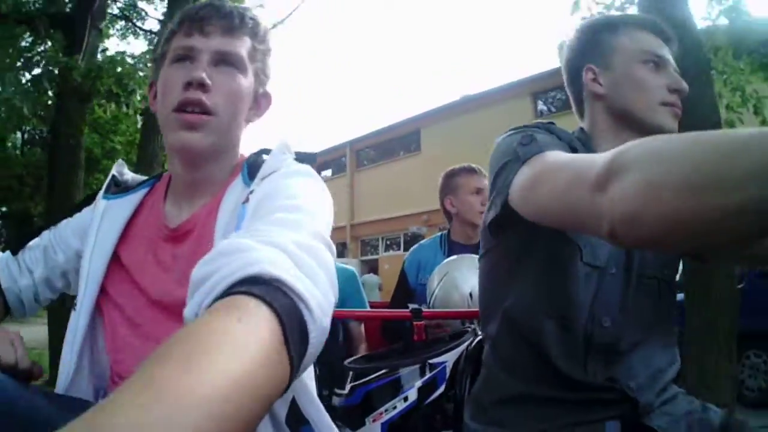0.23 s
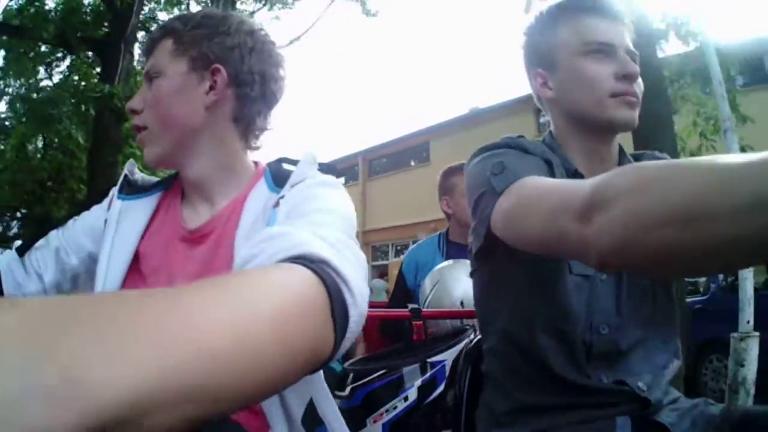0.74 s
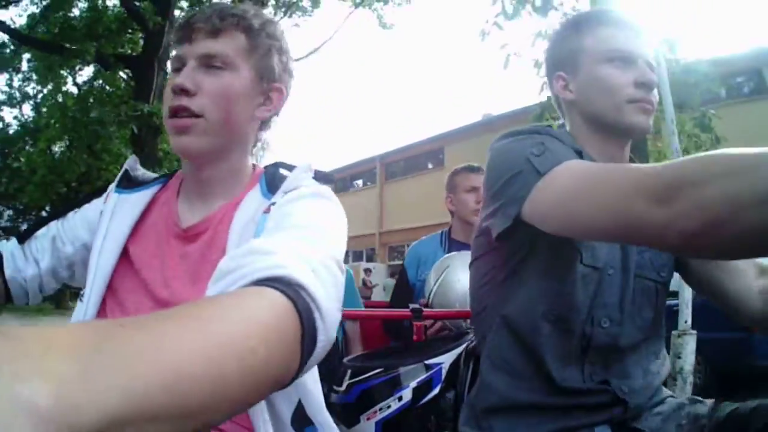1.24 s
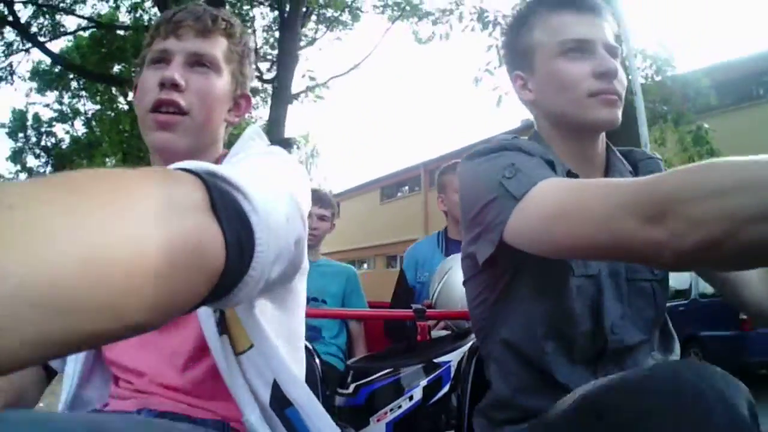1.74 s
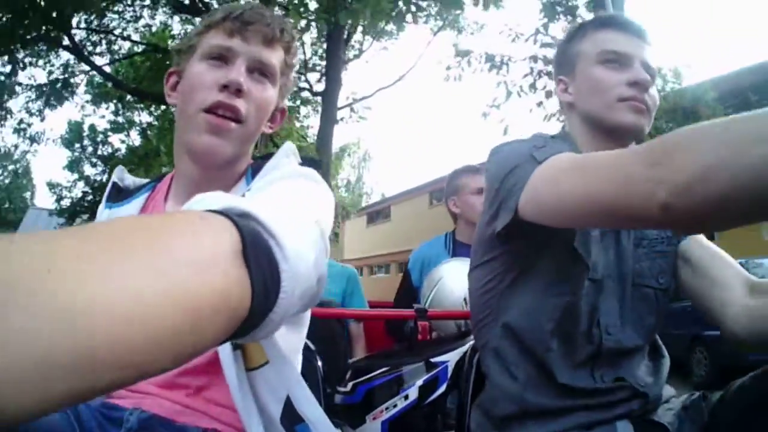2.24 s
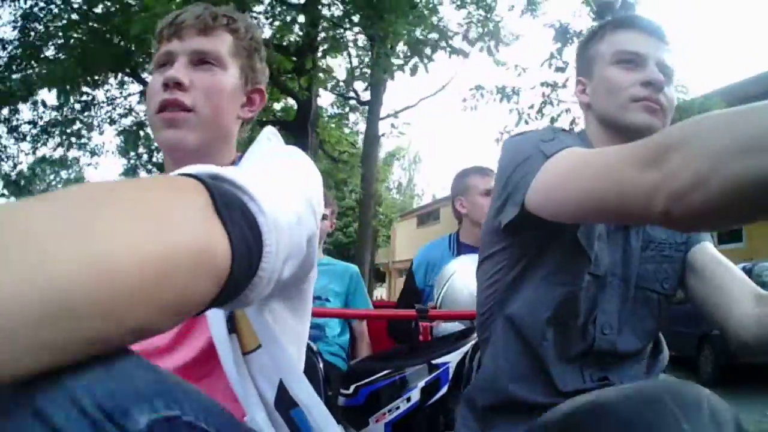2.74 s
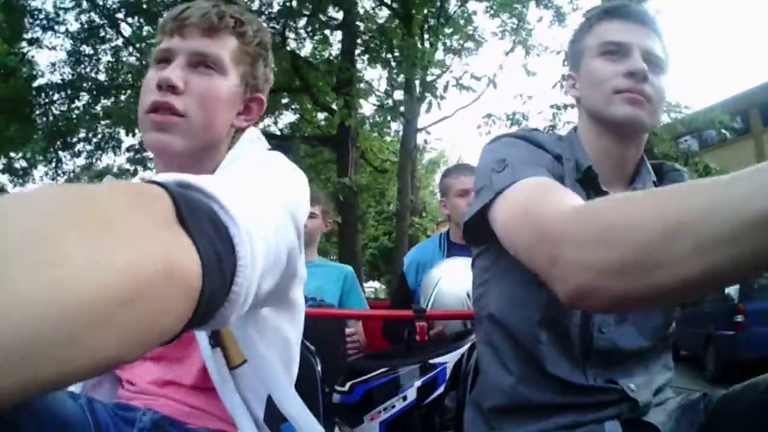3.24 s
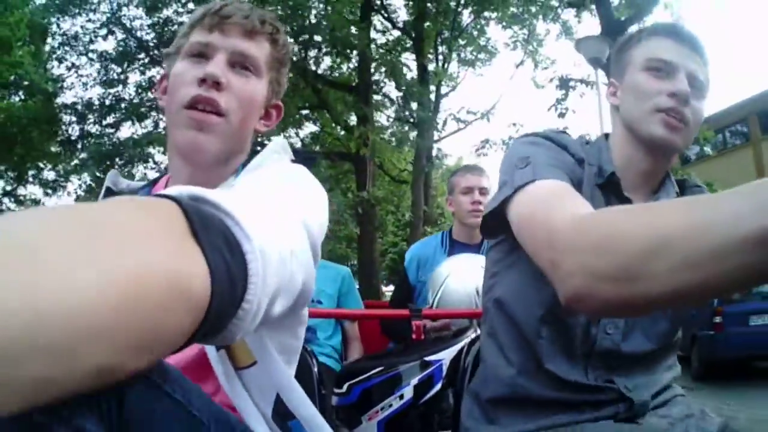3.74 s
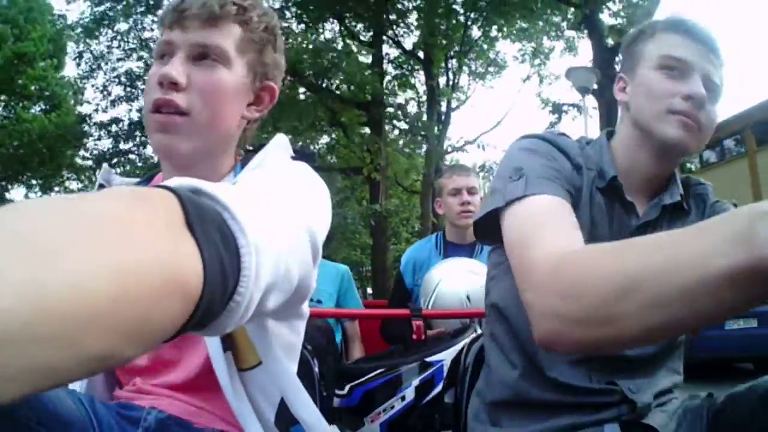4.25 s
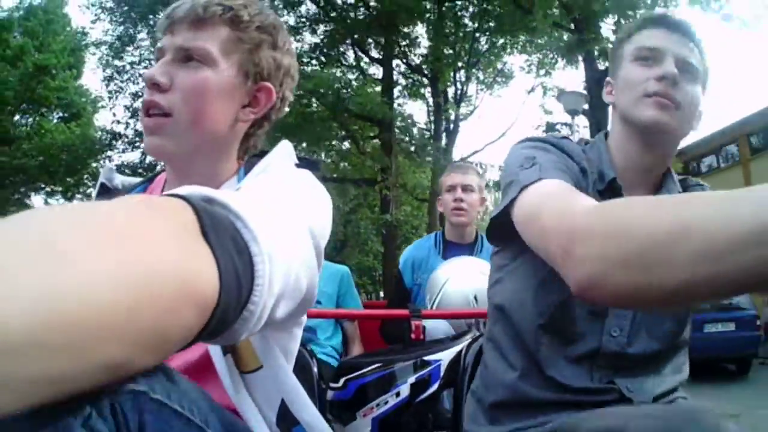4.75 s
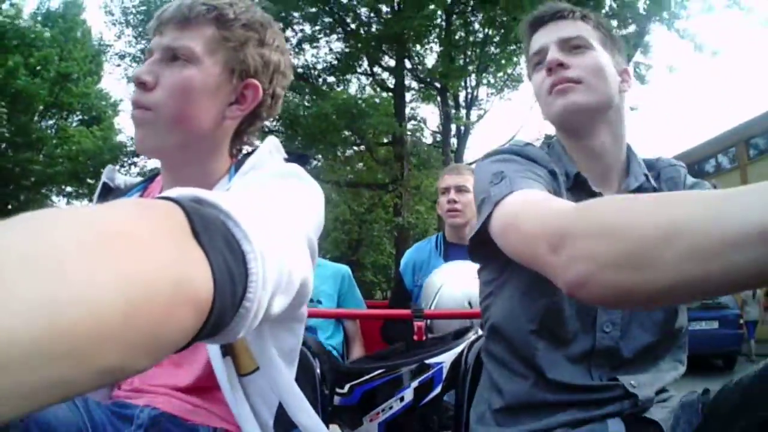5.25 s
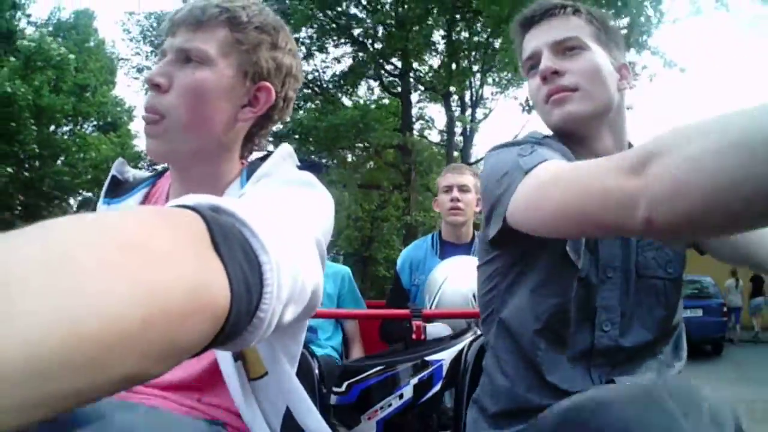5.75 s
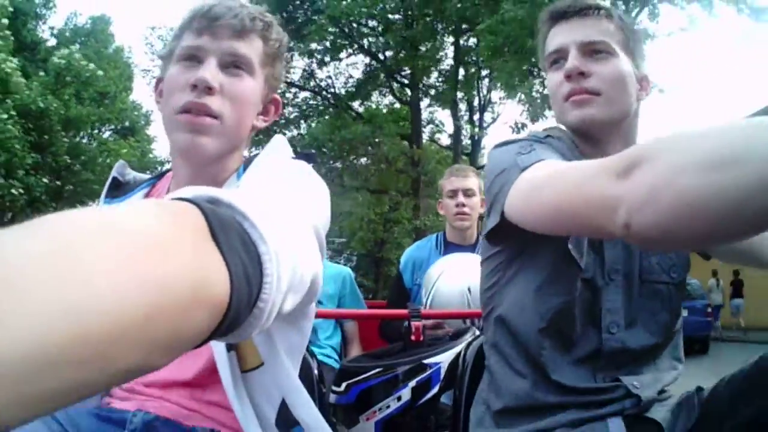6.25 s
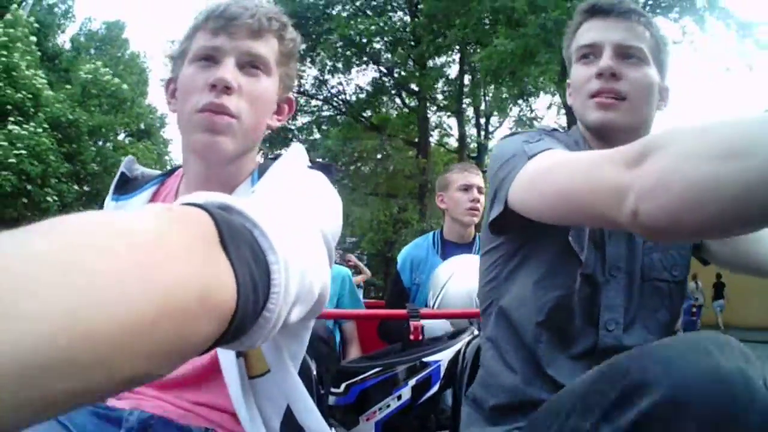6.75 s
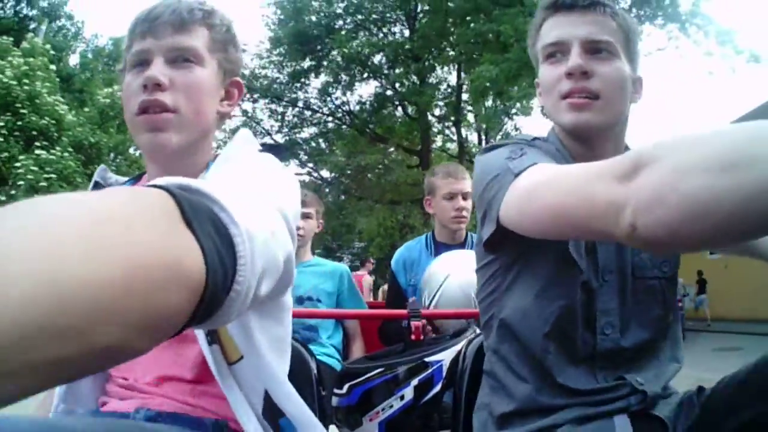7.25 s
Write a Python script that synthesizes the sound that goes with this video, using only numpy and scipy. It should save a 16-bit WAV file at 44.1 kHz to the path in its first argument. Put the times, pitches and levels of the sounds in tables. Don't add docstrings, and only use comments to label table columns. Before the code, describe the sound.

A small microphone clamped to a rolling cart picks up vibration through its case: a wavering deep hum, floor rumble, hollow panel knocks and chain rattle. A violent early blow distorts. Scattered metal clanks continue, with a quieter stretch around two to three seconds, then busier strikes and short bearing squeaks after five. Faint low wind, thin hiss and tiny rapid recorder ticks lie behind, outdoors and without noticeable echo.

```python
import sys
import numpy as np
from scipy import signal
from scipy.fft import rfft, irfft, next_fast_len
from scipy.io import wavfile
from scipy.ndimage import map_coordinates

SR = 44100
rng = np.random.default_rng(int(sys.argv[2]) if len(sys.argv) > 2 else 0)


def invert_db(level):
    return 10 ** (np.asarray(level, dtype=float) / 20)


def wav_record(signal):
    frames = np.transpose(np.atleast_2d(signal))
    bounded = np.clip(frames, -1, 1)
    quanta = np.round(bounded * 32767).astype(np.int16)
    wavfile.write(sys.argv[1], SR, quanta)


N = 330309

# t/s, load on the tyres level/dB, roughness level/dB
ROAD = [(0.0, -24.5, -32), (0.27, -35.5, -35), (0.6, -38, -36), (0.73, -35.5, -36.5), (2.19, -35.5, -35.5),
        (2.4, -35, -35.5), (2.8, -36.5, -37.5), (3.4, -38, -36.5), (3.59, -33, -36.5), (3.92, -37, -37),
        (4.69, -34, -37.5), (4.84, -34.5, -36), (5.23, -32.5, -34.5), (5.42, -32.5, -34.5),
        (5.61, -33, -34.5), (6.07, -32, -36.5), (6.26, -34, -35.5), (7.49, -36.5, -36)]
# t/s, peak level/dB, low bar above it level/dB, decay t60/s
CLINKS = [(0.0, -23.5, 3, 0.12), (0.044, -18.5, -1, 0.19), (0.1336, -18, 3.5, 0.065),
          (0.5195, -19, -11, 0.13), (0.5473, -23, -13, 0.087), (0.8934, -22.5, 6.5, 0.092),
          (1.2446, -22, -1.5, 0.17), (1.2905, -18.5, 7, 0.082), (1.7425, -21, -3.5, 0.15),
          (3.493, -29, 5, 0.077), (3.5137, -23.5, 0, 0.1), (3.5642, -18, -2.5, 0.11),
          (3.85, -15.5, -6.5, 0.09), (3.922, -17, -3.5, 0.064), (4.72, -25.5, -16, 0.075),
          (4.8453, -16, -1, 0.18), (5.352, -23.5, 2.5, 0.07), (5.4101, -13.5, -3, 0.091),
          (5.4953, -23.5, 4, 0.092), (5.7812, -11, -4, 0.091), (5.8293, -15.5, -8, 0.12),
          (5.9396, -16.5, -2, 0.12), (6.4293, -17, -3, 0.095), (6.592, -12.5, 1, 0.076),
          (6.751, -22, 1.5, 0.17), (6.9108, -19, 1, 0.11), (6.9338, -26, -7, 0.053),
          (7.2637, -18, -8, 0.082), (7.284, -22.5, -6, 0.13), (7.3397, -17.5, 2.5, 0.042)]
# f/Hz, width f/Hz, level/dB
DECK = [(113, 43, -17), (168.5, 39.2, -7.5), (208.5, 22.6, -6), (276.3, 17.1, 0.5), (310, 180, -29),
        (458, 75, -31)]
# f/Hz, width f/Hz, level/dB
PANEL = [(788, 46, -12.5), (898, 32, 2.5), (1055.4, 25.6, 2), (1159.7, 35, -1), (1284, 57, -3),
         (1397, 71, -8), (1667, 93, -10.5)]
# f/Hz, width f/Hz, level/dB
BAR = [(2089, 66.4, 3), (2326, 210, -8)]
# f/Hz, width f/Hz, level/dB
STEEL = [(2493, 88, -5.5), (2679, 67, 0.5), (2814, 86, 3), (2986, 80, 2), (3179, 130, -8.5),
         (3434, 60, -7.5), (3592, 38, -13.5), (3759, 47, -5.5), (5175, 200, -16)]


def unit(x):
    return x / np.sqrt(np.mean(x ** 2) + 1e-20)


def curves(rows):
    s, *cols = np.transpose(rows)
    return [np.interp(np.arange(N) / SR, s, c) for c in cols]


def filtered(x, response, keep=True):
    m = next_fast_len(N + SR // 2)
    gain = response(np.fft.rfftfreq(m, 1 / SR))
    scale = np.sqrt(np.mean(abs(gain) ** 2)) if keep else 1
    return irfft(rfft(x, m) * gain / scale, m)[:N]


def peak(f, hz, width):
    return 1j * f * width / (hz * hz - f * f + 1j * f * width)


def rung(force, modes, kick=14):
    chatter = force * rng.standard_normal(N)
    strike = kick * np.maximum(np.diff(force, prepend=force[0]), 0)

    def response(f):
        return sum((-1) ** k * invert_db(db) * peak(f, hz, width) for k, (hz, width, db) in enumerate(modes))

    return filtered(chatter + strike, response)


def coloured(points):
    hz, db = np.transpose(points)
    white = rng.standard_normal(N)
    return filtered(white, lambda f: invert_db(np.interp(np.log(f + 1), np.log(hz), db, -120, -120)))


def bursts(times, db, t60, hold=.012, rise=1e-5):
    force = np.zeros(N + SR)
    t = np.arange(SR // 2) / SR
    swell = np.minimum(1, .3 + t / rise)
    for s, level_db, fall in zip(times, db, t60):
        decay_db = 60 * np.maximum(t - hold, 0) / max(fall, .01)
        force[round(s * SR):][:len(t)] += invert_db(level_db - decay_db) * swell
    return force[:N]


def bumps(count, spread_db, t60):
    when, size = rng.random((count, 2)).T
    hits = np.bincount((when * N).astype(int), invert_db(-spread_db * np.log(size + .03)), N)
    return unit(signal.lfilter([1], [1, -invert_db(-60 / (t60 * SR))], hits))


def soft(x, top_hz):
    return filtered(x, lambda f: 1 / (1 - (f / top_hz) ** 2 + 1.2j * f / top_hz) ** 2, keep=False)


def rough(grows):
    db = curves(ROAD)[1]
    return db.mean() + grows * (db - db.mean())


def sway():
    # t/s, level/dB
    swing = [(0.0, -52), (0.25, -38), (0.5, -42.5), (1.35, -35), (2.67, -35), (2.9, -38.5), (3.25, -29),
             (3.42, -34.5), (3.52, -53), (3.59, -38), (5.01, -36.5), (5.09, -45), (5.34, -34.5),
             (6.22, -41), (6.8, -30), (6.97, -40.5), (7.45, -34), (7.49, -32)]
    # t/s, stall depth level/dB, pitch pull f/Hz
    stalls = [(0.0, 27, 1), (0.12, 31, 0), (0.42, 9, 0.5), (0.56, 14.5, 3.5), (1.02, 16, -3.5),
              (1.651, 6.5, -1.5), (2.73, 2.5, 0.5), (2.92, 5, -1.5), (3.521, 23, 0), (4.3, 7, 1),
              (4.63, 16, -1), (5.091, 15, 3), (5.28, 11.5, 0), (5.7, 12, -5.5), (5.941, 5.5, -2.5),
              (6.15, 14, 0.5), (6.339, 9.5, -0.5), (7.069, 11.5, 2), (7.22, -1, 0.5), (7.35, 2.5, -1.5)]
    centre_hz, drift_hz, flutter_db = 44, 1.1, 0.65
    stall_s, pull_s = 0.027, .07
    t = np.arange(0, N + 64, 64) / SR
    s, depth_db, pull_hz = np.transpose(stalls)[:, :, None]
    near = abs(t - s)
    knots, swell = rng.standard_normal((2, 120))
    drift = drift_hz * np.interp(t, np.arange(120) / 15, knots)
    pull = (pull_hz * np.exp(-(near / pull_s) ** 2)).sum(0)
    loss_db = (depth_db * np.exp(-near / stall_s)).sum(0)
    flutter = flutter_db * map_coordinates(swell, [t * 14])
    hz, stall_db = curves(np.transpose([t, centre_hz + drift + pull, loss_db + flutter]))
    return invert_db(curves(swing)[0] - stall_db + 5.5) * np.sin(2 * np.pi * np.cumsum(hz) / SR)


def deck():
    # t/s, peak level/dB, decay t60/s
    thumps = [(0.0, -20.5, 0.1), (0.054, -21, 0.05), (0.089, -40, 0.14), (0.141, -22.5, 0.57),
              (0.356, -22.5, 0.063), (0.433, -14.5, 0.31), (0.531, -17.5, 0.36), (0.599, -12.5, 0.1),
              (0.6209, -18.5, 0.086), (0.716, -23, 0.094), (1.199, -23, 0.14), (1.29, -19.5, 0.23),
              (1.872, -11.5, 0.11), (2.495, -19.5, 0.074), (3.38, -21, 0.14), (3.46, -13, 0.23),
              (4.881, -11, 0.25), (5.015, -16.5, 0.046), (5.216, -23, 0.19), (5.305, -18.5, 0.13),
              (5.4, -26.5, 0.2), (5.772, -18, 0.2), (6.047, -21.5, 0.05), (6.249, -20.5, 0.15),
              (6.294, -18.5, 0.06), (6.563, -28, 0.084)]
    s, db, t60 = np.transpose(thumps)
    shake = invert_db(curves(ROAD)[0] + 2) * unit(0.2 + bumps(count=200, spread_db=-2.5, t60=0.6))
    blows = bursts(s, db - 11.5, 1.2 * t60, hold=0.018)
    return rung(shake, DECK) + soft(rung(blows, DECK, kick=42), top_hz=800)


def panels(stones):
    # t/s, peak level/dB, box resonance above it level/dB
    knocks = [(0.0, -37, -12.5), (0.045, -23.5, -5), (0.133, -17, -11.5), (0.483, -16.5, -24.5),
              (0.897, -17.5, -30), (1.293, -10.5, -17), (7.284, -28, -11), (1.744, -24.5, -30),
              (1.869, -10.5, -32), (2.499, -31.5, 1), (3.212, -28, -16), (3.456, -17.5, -8),
              (3.852, -20.5, -9), (3.924, -23, -35), (4.8455, -16.5, -7), (5.016, -14, -48),
              (5.038, -35.5, -31), (5.351, -22.5, 0.5), (5.442, -23, -1), (5.506, -20.5, -25.5),
              (5.774, -18.5, -8), (5.831, -26, -16.5), (5.94, -22.5, -10), (6.204, -27, -35),
              (6.295, -24, 4), (6.441, -25, -30), (6.588, -24, -14), (6.752, -24.5, -18.5),
              (6.916, -22, -7.5), (7.268, -18, -13)]
    # f/Hz, width f/Hz, level/dB
    box_modes = [(635.3, 39, 0)]
    last_s, last_db = CLINKS[-1][:2]
    s, db, box_db = np.transpose([*knocks, (last_s, last_db - 3.5, -16)])
    t60 = np.full(len(s), 0.082)
    load = unit(2.2 + 1.2 * stones + 0.47 * bumps(count=300, spread_db=0, t60=0.089))
    shake = invert_db(rough(grows=0.82) - 1.5) * load
    box = rung(invert_db(-9.0) * shake + bursts(s, db + box_db - 7, t60, hold=0.018), box_modes)
    return box + rung(shake + bursts(s, db - 9.5, t60, hold=0.0038), PANEL, kick=23)


def steel(stones):
    # t/s, peak level/dB, low bar above it
    # level/dB
    light_clinks = [(0.6385, -38, -17), (0.6834, -46, 6.5), (0.737, -35.5, 9), (0.7682, -28, -5.5),
                    (1.2302, -36, -5), (1.3707, -39, -10), (0.075, -25, 8), (1.4957, -38, -10), (1.526, -29, -14),
                    (1.5727, -31, -10.5), (1.653, -36, -11), (1.8646, -33, 7.5), (2.0787, -37, 5),
                    (2.112, -31.5, 3), (2.5725, -33, 3.5), (2.6396, -35, -11), (2.942, -34.5, 4.5),
                    (3.2025, -32, 6), (3.4131, -36, 0.5), (3.4574, -31.5, 1.5), (3.83, -35, -7), (4.684, -29, -3),
                    (5.018, -33, 8), (5.3038, -35, 9), (5.528, -27, -5), (5.5562, -37, 12), (5.6154, -42, 16.5),
                    (6.3765, -33.5, -4), (6.7775, -26.5, -4), (7.08, -30.5, 2)]
    # f/Hz, width f/Hz, level/dB
    link_modes = [(2740, 190, -13.5), (3255, 360, 6), (3730, 100, -6.5)]
    light_t60 = 0.044
    s, db, bar_db, t60 = np.transpose([*CLINKS, *((*light, light_t60) for light in light_clinks)])
    s = np.maximum(s - .002, 0)
    load = unit(1.1 + 0.5 * stones + 0.49 * bumps(count=500, spread_db=6.5, t60=0.18))
    shake = invert_db(rough(grows=0.76) - 2) * load
    bar_hits = bursts(s, db + bar_db - 7.0, 0.84 * t60, hold=0.0093, rise=.005)
    bar = rung(invert_db(-0.5) * shake + bar_hits, BAR)
    link = rung(bursts(s, db - 11.5, 0.4 * t60, hold=0.0077, rise=0.0045), link_modes, kick=12.0)
    steel_hits = bursts(s, db - 10, t60, hold=0.006, rise=0.0025)
    return bar + soft(link, top_hz=3870) + rung(invert_db(-4.5) * shake + steel_hits, STEEL, kick=17)


def blow():
    # panel level/dB, steel level/dB, deck level/dB
    shares = (-2.7, -11, -17)
    panel_db, steel_db, deck_db = shares
    blow_s, hold_s = .4254, .016

    def damped(modes):
        return [(hz, 2.3 * width, db) for hz, width, db in modes]

    force = bursts([blow_s], [0], [.025], hold_s)
    hit = invert_db(panel_db) * rung(force, damped(PANEL), kick=7.6)
    hit = hit + invert_db(steel_db) * rung(force, damped(BAR + STEEL), kick=32)
    hit = hit + invert_db(deck_db) * rung(force, damped(DECK), kick=3.4)
    after = bursts([blow_s], [0], [.22], hold_s)
    return hit + invert_db(-14) * rung(after, PANEL, kick=6.1) + invert_db(-11.5) * rung(after, BAR + STEEL, kick=1.6)


def squeaks():
    # t/s, length t/s, pitch f/Hz, level/dB
    slides = [(5.204, .068, 2845, -28), (5.268, .068, 2990, -29), (5.348, .016, 3400, -32),
              (5.375, .02, 2860, -30), (2.303, .025, 3750, -35), (3.065, .03, 3400, -41),
              (3.928, .042, 3780, -39), (4.01, .02, 3550, -41), (4.075, .02, 3500, -40),
              (5.53, .04, 3750, -37), (6.374, .025, 3600, -35), (6.432, .02, 3400, -30)]
    out = np.zeros(N + SR)
    for s, length, hz, db in slides:
        t = np.arange(int(length * SR)) / SR
        knot_s = np.arange(30) * .0028
        slips, drift = (np.interp(t, knot_s, knots) for knots in rng.standard_normal((2, 30)))
        tone = np.sin(2 * np.pi * np.cumsum(hz + 45 * drift) / SR)
        swell = np.sin(np.pi * t / length) ** .3
        out[round(s * SR):][:len(t)] += invert_db(db - 1.5 + 4.5 * slips) * swell * tone
    return out[:N]


def wind():
    # f/Hz, level/dB
    lows = [(15, -14.5), (35, 6.5), (55, -7), (75, -3), (500, -27.5), (1500, -42.5), (4000, -40.5),
            (4400, -120)]
    return invert_db(-50.0) * coloured(lows)


def case(x):
    # f/Hz, width f/Hz, depth level/dB
    deaf = [(69, 52, 5), (523, 100, 12.5), (691.5, 94, 15), (1510, 242, 17.5), (1769, 310, 13)]

    def dead_spots(f):
        return np.prod([1 - (1 - invert_db(-db)) * peak(f, hz, width) for hz, width, db in deaf], axis=0)

    x = filtered(x, dead_spots, keep=False)
    below_step = signal.sosfilt(signal.butter(8, 3950, fs=SR, output="sos"), x)
    band_edge = signal.ellip(10, .5, 95, 5800, fs=SR, output="sos")
    return signal.sosfilt(band_edge, invert_db(-15.0) * x + below_step)


def input_noise():
    # f/Hz, density level/dB
    hiss = [(3000, -25.5), (3900, -3.5), (4150, -10), (4940, -8), (5230, -14), (5790, -25), (6050, -37.5),
            (6250, -120)]
    seam_hz = 57.614
    seams = np.round(np.arange(.59 / seam_hz, N / SR, 1 / seam_hz) * SR).astype(int)
    late = np.arange(N) / SR - 1.46
    rise_s, fall_s = 0.71, .2
    leak_db = -68.5 + 6.5 * np.exp(-abs(late) / np.where(late < 0, rise_s, fall_s))
    grit = rng.standard_normal(N) * (rng.random(N) < 130 / SR)
    ticks = grit * invert_db(2.2 * (leak_db + 63.0))
    ticks[seams] = .75 + .3 * rng.standard_normal(len(seams))
    hz, db = np.transpose(hiss)
    ticks = filtered(ticks, lambda f: invert_db(np.interp(f, hz, db, -120, -120)) * (f / 5000) ** 2.5)
    return invert_db(-38) * ticks + invert_db(.6 * (leak_db + 65) - 65.5) * coloured(hiss)


def scene():
    stones = bumps(count=300, spread_db=-0.85, t60=0.083)
    mix = sway() + deck() + panels(stones) + steel(stones) + blow() + squeaks() + wind()
    return mix[None]


def roll_off(x):
    return signal.sosfilt(signal.butter(12, 16450, fs=SR, output="sos"), x)


def record(dry):
    ceiling = .72
    x = case(dry[0]) + input_noise() - .0055
    fade_out = np.clip(np.arange(N)[::-1] / 200, 0, 1)
    x = np.clip(x, -ceiling, ceiling) * fade_out
    x = filtered(x, lambda f: 1 / (1 + (f / 15700) ** 70), keep=False)
    return roll_off(x[None])


dry = scene()
out = record(dry)
wav_record(out)
```